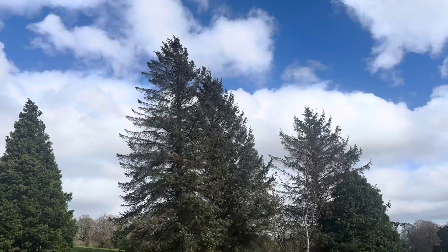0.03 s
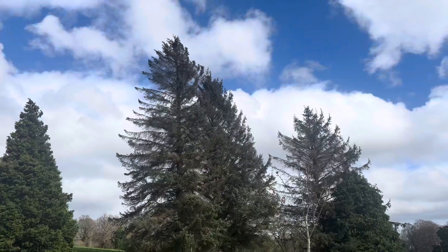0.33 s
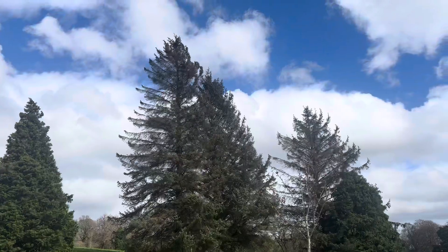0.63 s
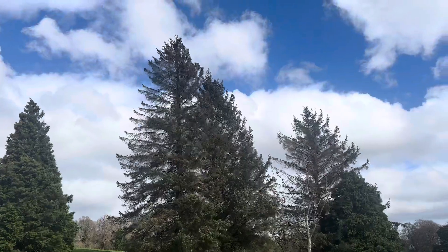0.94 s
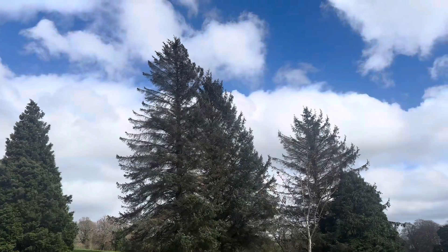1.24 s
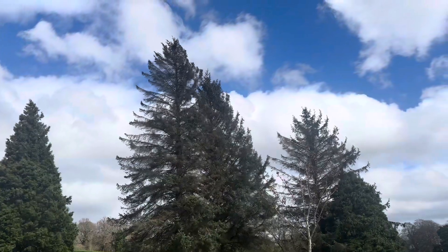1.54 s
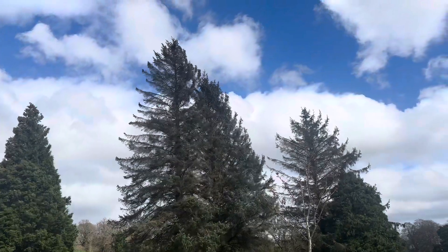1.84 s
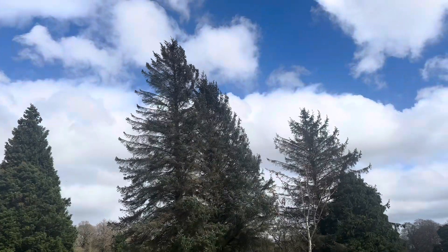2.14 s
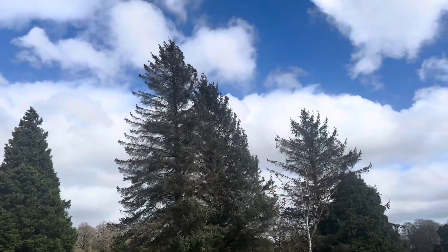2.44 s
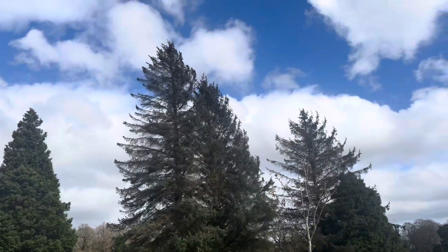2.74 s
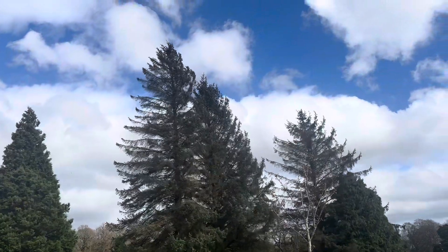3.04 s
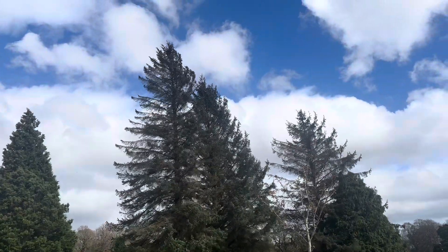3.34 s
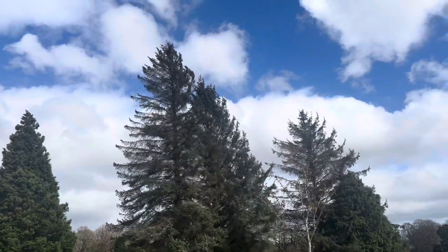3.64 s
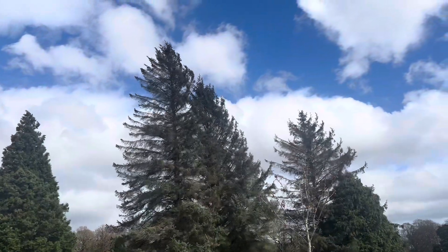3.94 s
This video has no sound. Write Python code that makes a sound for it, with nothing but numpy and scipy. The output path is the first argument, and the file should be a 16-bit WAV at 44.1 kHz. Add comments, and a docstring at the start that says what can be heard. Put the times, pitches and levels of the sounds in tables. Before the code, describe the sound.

Wind blows through evergreen trees in the open, with low, fluttering buffeting and short rasps of air on the microphone. The buffeting lulls midway and comes back weaker, while the rush of the trees carries on.

```python
"""Wind rushes through tall conifers from the outset, while nearer needles and twigs hiss and tick, and nearer
trees add a hollow sough. Air flowing over the microphone adds a low rumble and short rasps; its eddies thump
and flutter, hardest in the first second and a half. The sough dies away and the rumble lulls, and at 2.7 s a
twig clicks. Then the buffeting returns more softly as the trees slowly swell."""
import sys
import numpy as np
from scipy import signal
from scipy.fft import rfft, irfft, next_fast_len
from scipy.io import wavfile
from scipy.ndimage import uniform_filter1d, map_coordinates

SR = 44100
rng = np.random.default_rng(int(sys.argv[2]) if len(sys.argv) > 2 else 0)


def master(y):
    """Save y as 16-bit WAV."""
    cut = np.clip(np.atleast_2d(y).T, -1, 1)
    pcm = np.round(cut * 32767)  # scale
    wavfile.write(sys.argv[1], SR, pcm.astype(np.int16))


N = 176400
TIME = np.arange(N) / SR


def amp(db):
    """The decibel scale: 20 dB is a tenfold amplitude."""
    return 10 ** (np.asarray(db) / 20)


def unit(x):
    """Normalisation to an rms of 1."""
    return x / np.sqrt(np.mean(x ** 2) + 1e-20)


def along(points, hz):
    """Interpolation of (frequency, value) points on a logarithmic axis."""
    freqs, values = np.transpose(points)
    return np.interp(np.log(hz + 1), np.log(freqs + 1), values)


def curve(rows):
    """Linear interpolation of (time, value) points at every sample."""
    return np.interp(TIME, *np.transpose(rows))


def wobble(knots_per_s):
    """Random modulation: a smooth spline through Gaussian values."""
    return map_coordinates(rng.standard_normal(1024), [TIME * knots_per_s], mode="mirror")


def filtered(x, response):
    """Linear filtering: the spectrum is multiplied by a frequency response."""
    size = next_fast_len(N + 8192)
    return irfft(rfft(x, size) * response(np.fft.rfftfreq(size, 1 / SR)), size)[..., :N]


def coloured(x, spectrum):
    """Spectral shaping by (frequency, level) points, normalised to an rms of 1."""
    return unit(filtered(x, lambda hz: amp(along(spectrum, hz))))


def patchy_noise(depth_db):
    """Modulation in time and frequency: two white noises with drifting patches of gain."""
    spectra = signal.stft(rng.standard_normal((2, N)), nperseg=512)[2]
    patches = uniform_filter1d(rng.standard_normal(spectra.shape[1:]), size=7, axis=0)
    patches = uniform_filter1d(patches, size=18, axis=1)
    return signal.istft(spectra * amp(depth_db * unit(patches)), nperseg=512)[1][:, :N]


def stereo(pair, coherence, lead):
    """Partial coherence: two independent noises mix into left and right, shifted in phase."""
    angle = lambda hz: np.arccos(np.clip(along(coherence, hz), 0, 1)) / 2
    mid, side = filtered(pair, lambda hz: np.array([np.cos(angle(hz)), np.sin(angle(hz))]))
    phase_shift = lambda hz: np.exp(np.outer([.5j, -.5j], along(lead, hz)))
    return filtered(np.array([mid + side, mid - side]), phase_shift)


# wind strength in the crowns (time [s], level [dB])
CROWN_LEVEL = [(0, -40.5), (.6, -42.5), (1.1, -42.5), (1.7, -41), (2.3, -41), (2.8, -39.5), (3.3, -38.5),
               (3.7, -39), (4, -39)]
# rush of the trees on each side (frequency [Hz], relative spectral level [dB])
RUSH_LEFT = [(30, 2.5), (100, -24), (300, 0), (560, -0.5), (900, -1), (1500, -1), (2200, -2), (3400, -6.5),
             (4300, -13), (5600, -13), (7500, -23.5), (9600, -26.5), (10900, -42.5), (14500, -45),
             (16000, -63)]
RUSH_RIGHT = [(30, -14), (100, 1), (300, -2), (560, 4), (900, 3), (1500, 0.5), (2200, -2.5), (3400, -10.5),
              (4300, -14.5), (5600, -24), (7500, -27), (9600, -22), (10900, -43.5), (14500, -39.5),
              (16000, -56)]
# likeness of left and right in the rush and hiss (frequency [Hz], coherence [0-1])
TREE_COHERENCE = [(100, 0.59), (350, 1), (600, 0.29), (1100, 0.041), (1700, 0.2), (2200, 0.43), (3400, 0.5),
                  (5200, 0.11), (6500, 0.14), (7700, 0.6), (9300, 0.33), (10200, 1), (13500, 1),
                  (15000, .6)]
# phase between left and right (frequency [Hz], lead of the left [rad])
TREE_LEAD = [(100, 2.5), (350, -1.6), (600, -1.2), (900, -1), (1400, .5), (2100, 0.27), (3400, 0.75),
             (4900, 0), (5900, -3), (6900, -5), (7600, -2.6), (8400, -3.05), (9200, -5.05), (10200, -5.5)]
def trees():
    """Aerodynamic noise: wind in the crowns makes a broad rush, brighter on the left."""
    left, right = stereo(patchy_noise(depth_db=1.05), TREE_COHERENCE, TREE_LEAD)
    rush = np.array([coloured(left, RUSH_LEFT), amp(db=-2) * coloured(right, RUSH_RIGHT)])
    return amp(curve(CROWN_LEVEL) + 0.17 * wobble(knots_per_s=8.7)) * rush


# hiss of the nearer needles (time [s], level [dB])
NEEDLE_LEVEL = [(0, -56), (1.1, -61.5), (2.2, -60.5), (3.1, -63.5), (3.65, -57), (3.82, -58), (4, -57)]
# colour of the hiss and ticks (frequency [Hz], relative spectral level [dB])
NEEDLE_SPECTRUM = [(1000, -13.5), (3000, 7), (6000, 2), (8000, -3.5), (9600, -3), (11000, -17.5),
                   (15000, -25)]
TICKS_PER_S, TICK_DB, TICK_SPREAD_DB = 40, -68.5, 2
def needles():
    """Flow noise and shot noise: near branches hiss in the gust, and random impulses tick faintly."""
    level_db = curve(NEEDLE_LEVEL)
    colour = lambda pair: coloured(stereo(pair, TREE_COHERENCE, TREE_LEAD), NEEDLE_SPECTRUM)
    hiss = colour(patchy_noise(depth_db=-3.5))
    impulses = rng.random((2, N)) < TICKS_PER_S / SR
    ticks = colour(impulses * amp(TICK_SPREAD_DB * rng.standard_normal((2, N))))
    return amp(level_db) * hiss + amp(TICK_DB + level_db - level_db.max()) * ticks


def puff_power(peak_time, length, peak_db):
    """Asymmetric Gaussian pulses: one row of power per puff, rising quickly and falling more slowly."""
    age = (TIME - peak_time[:, None]) / length[:, None]
    width = np.where(age < 0, 0.29, 0.63)  # rise and fall, as shares of the length
    return amp(peak_db)[:, None] ** 2 * np.exp(-np.minimum((age / width) ** 2, 100))


# steady flow over the microphone (time [s], level [dB])
FLOW_LEVEL = [(0, -27), (.28, -26.5), (.39, -35.5), (.5, -30.5), (.77, -30.5), (.95, -30), (1.3, -26.5),
              (1.335, -29), (1.42, -31.5), (1.5, -34), (1.7, -31), (1.88, -34.5), (1.95, -41),
              (2.07, -37.5), (2.38, -45.5), (2.5, -44), (2.76, -48), (2.85, -37.5), (3.12, -39.5),
              (3.4, -41), (3.55, -36.5), (3.82, -34.5), (3.94, -41), (4, -36.5)]
# upper edge of its rumble (time [s], cutoff [Hz])
FLOW_CUTOFF = [(0, 410), (.6, 345), (1.3, 248), (1.7, 177), (2.6, 180), (3.2, 335), (4, 330)]
# eddies that hit the microphone (time [s], length [s], peak level [dB], cutoff [Hz])
EDDIES = [(0.072, 0.033, -24, 550), (0.132, 0.028, -18, 350), (0.155, 0.017, -19, 600),
          (0.26, 0.069, -25.5, 445), (0.319, 0.04, -23.5, 246), (0.512, 0.01, -19.5, 397),
          (0.548, 0.013, -21.5, 540), (0.566, 0.021, -16, 185), (0.609, 0.018, -25.5, 280),
          (0.678, 0.017, -21, 201), (0.711, 0.023, -18.5, 380), (0.754, 0.11, -28, 178),
          (0.981, 0.026, -28, 560), (1.012, 0.012, -19.5, 624), (1.028, 0.018, -23, 260),
          (1.072, 0.03, -31.5, 755), (1.088, 0.012, -20, 593), (1.118, 0.021, -15, 566),
          (1.143, 0.013, -18.5, 344), (1.225, 0.055, -18, 775), (1.232, 0.016, -11.5, 340),
          (1.257, 0.024, -17.5, 700), (1.275, 0.024, -17, 350), (1.348, 0.0075, -23, 600),
          (1.363, 0.012, -29, 470), (1.441, 0.057, -25.5, 208), (1.572, 0.035, -21.5, 227),
          (1.606, .022, -23, 169), (1.675, 0.042, -31.5, 394), (1.725, 0.018, -27, 200),
          (1.783, 0.015, -22, 198), (1.811, 0.017, -23.5, 137), (1.916, 0.011, -24.5, 390),
          (1.984, 0.04, -33.5, 400), (2.017, 0.032, -28.5, 167), (2.148, 0.012, -30.5, 296),
          (2.298, 0.053, -35.5, 147), (2.816, 0.044, -35, 274), (2.885, 0.02, -32.5, 171),
          (2.964, 0.015, -35.5, 210), (2.997, 0.033, -30.5, 211), (3.058, 0.014, -31, 214),
          (3.487, 0.019, -30.5, 211), (3.61, 0.026, -27.5, 290), (3.68, .014, -40, 330),
          (3.712, 0.051, -26, 288), (3.884, 0.019, -39, 300)]
# buffeting before the roll-offs (frequency [Hz], relative spectral level [dB])
RUMBLE_SPECTRUM = [(15, -48), (28, -31), (40, -7.5), (58, 4.5), (90, 2), (150, -1.5), (220, -5),
                   (400, -5.5), (560, -7), (1000, -11.5), (2000, -27), (6000, -23)]
# likeness of the buffeting at the two microphone ports (frequency [Hz], coherence [0-1])
RUMBLE_COHERENCE = [(50, 0.76), (250, 0.77), (420, 0.81), (650, 0.5), (1200, 0.83)]
# its phase between the ports (frequency [Hz], lead of the left [rad])
RUMBLE_LEAD = [(50, 0), (250, .05), (450, .4), (750, 1.15), (1300, 2.2)]
ROLL_OFF_ORDER, BASS_CUTOFF_RATIO = 3.54, 0.15
FLUTTER_DB, FLUTTER_PER_S = 1, 35
EDDY_SINK_OCTAVES = 0.48  # fall of the cutoff over one eddy length
def buffeting():
    """Turbulent pressure at the ports: each eddy swells the rumble, bright in front, dull in its wake."""
    centres = 25 * 2 ** (np.arange(17) / 2)  # half-octave bands, Hz
    band_power = amp(along(RUMBLE_SPECTRUM, centres)) ** 2 * centres

    def shares(cutoff_hz):
        """Division of power among the bands: small, bright eddies carry less bass."""
        power = band_power[:, None] / (1 + (centres[:, None] / cutoff_hz) ** (2 * ROLL_OFF_ORDER))
        power = power / (1 + (BASS_CUTOFF_RATIO * cutoff_hz / centres[:, None]) ** 2)
        return power / power.sum(axis=0)

    noise = stereo(rng.standard_normal((2, N)), RUMBLE_COHERENCE, RUMBLE_LEAD)
    flow = amp(curve(FLOW_LEVEL) + FLUTTER_DB * wobble(FLUTTER_PER_S))
    power = shares(curve(FLOW_CUTOFF)) * flow ** 2
    swells = puff_power(*np.transpose(EDDIES)[:3])
    for (peak_time, length, _, cutoff_hz), swell in zip(EDDIES, swells):
        age = (TIME - peak_time) / length
        alive = np.flatnonzero(abs(age) < 2)
        sinking_hz = cutoff_hz * 2 ** (-EDDY_SINK_OCTAVES * np.clip(age[alive], -.5, 1))
        power[:, alive] += shares(sinking_hz) * swell[alive]

    def band(centre):
        """Band-pass filtering by a triangle reaching half an octave each way."""
        return unit(filtered(noise, lambda hz: np.maximum(0, 1 - 2 * abs(np.log2((hz + 1) / centre)))))

    return sum(np.sqrt(row / 2) * band(centre) for centre, row in zip(centres, power))


# likeness of the sough and rasps at the two ports (frequency [Hz], coherence [0-1])
ANTIPHASE_COHERENCE = [(500, 0.12), (1500, 0.38)]
def antiphase_noise(spectrum):
    """Antiphase: the coherent part of this noise reaches the two ports half a cycle apart."""
    pair = stereo(patchy_noise(depth_db=0.5), ANTIPHASE_COHERENCE, lead=[(0, np.pi)])
    return coloured(pair, spectrum)


# a sough that dies away and faintly returns (time [s], level [dB])
SOUGH_LEVEL = [(0, -48), (.35, -42), (.7, -42.5), (1, -45), (1.4, -47), (1.8, -82), (4, -57)]
# its hollow colour (frequency [Hz], relative spectral level [dB])
SOUGH_SPECTRUM = [(150, -18), (350, -3), (560, 0), (800, -3), (1200, -10.5), (2500, -28), (10000, -75)]
def sough():
    """Band of noise: the nearer trees make a hollow whoosh that swells and dies away."""
    return amp(curve(SOUGH_LEVEL)) * antiphase_noise(SOUGH_SPECTRUM)


# air scraping across the ports (time [s], length [s], peak level [dB])
RASPS = [(0.11, 0.017, -39), (0.146, 0.022, -36.5), (0.346, 0.016, -31.5), (0.388, 0.014, -36),
         (0.415, 0.012, -43), (0.464, 0.0054, -32), (0.542, 0.0074, -31.5), (0.736, 0.017, -36.5),
         (1.229, 0.07, -32)]
# colour of the scraping (frequency [Hz], relative spectral level [dB])
RASP_SPECTRUM = [(200, -31), (500, 7.5), (750, 8.5), (1300, 1), (2100, -8.5), (3000, -22.5), (6000, -33),
                 (11000, -71)]
RASP_LEFT_DB = -3
def rasps():
    """Incoherent addition: short puffs scrape the ports, mostly the right one, and their powers sum."""
    envelope = np.sqrt(puff_power(*np.transpose(RASPS)).sum(axis=0))
    return amp([[RASP_LEFT_DB], [0]]) * envelope * antiphase_noise(RASP_SPECTRUM)


# colour of a twig's click (frequency [Hz], relative spectral level [dB])
TWIG_SPECTRUM = [(2000, -20), (5000, 0), (10000, 0), (11500, -5), (14000, -6), (16000, -22)]
def twig(onset_s=2.681, level_db=-61, t60_s=.13):
    """Exponential decay: one faint, dry click dies away in the foliage."""
    age = TIME - onset_s
    noise = stereo(rng.standard_normal((2, N)), TREE_COHERENCE, TREE_LEAD)
    return (age > 0) * amp(level_db - 60 * abs(age) / t60_s) * coloured(noise, TWIG_SPECTRUM)


def scene():
    """Superposition: trees at a distance add to moving air right at the microphone."""
    return trees() + needles() + buffeting() + sough() + rasps() + twig()


START_S, TOP_HZ = .036, 15700
def record(dry):
    """Gating and band limiting: the sound opens just after the start and is cut off above TOP_HZ."""
    return filtered(dry * (TIME > START_S), lambda hz: hz < TOP_HZ)


dry = scene()
out = record(dry)
master(out)
```